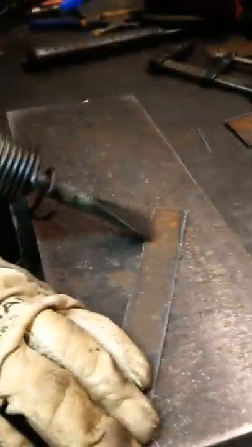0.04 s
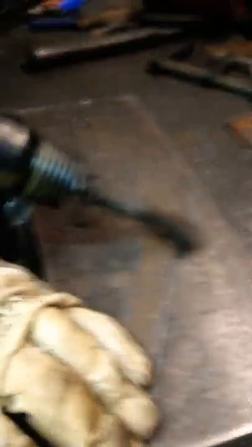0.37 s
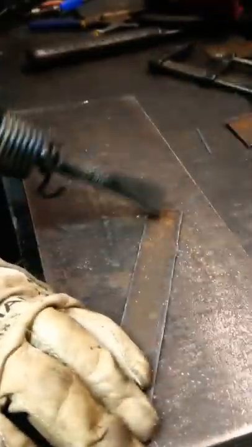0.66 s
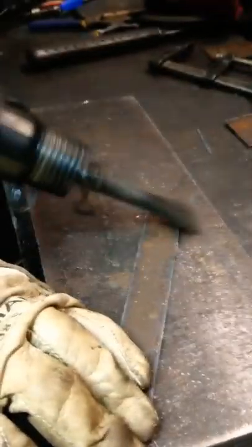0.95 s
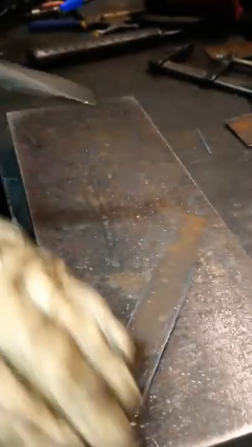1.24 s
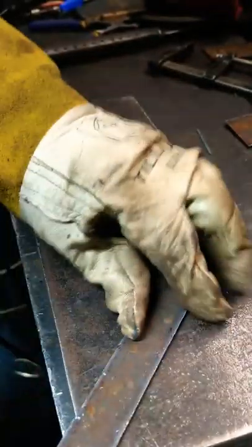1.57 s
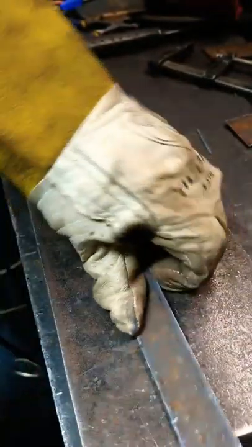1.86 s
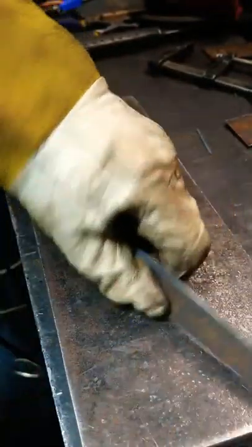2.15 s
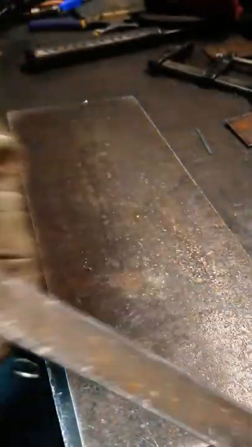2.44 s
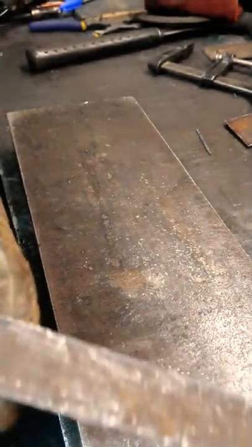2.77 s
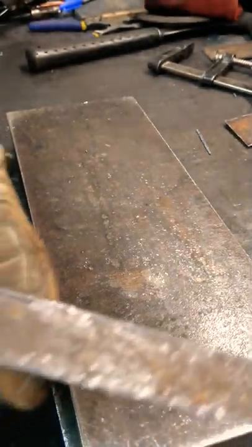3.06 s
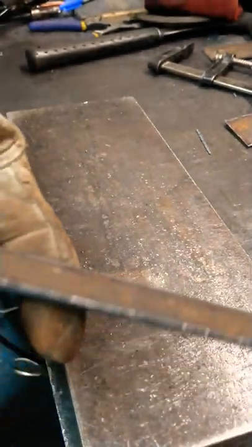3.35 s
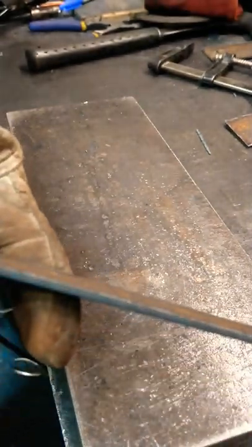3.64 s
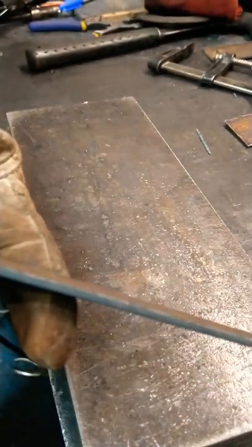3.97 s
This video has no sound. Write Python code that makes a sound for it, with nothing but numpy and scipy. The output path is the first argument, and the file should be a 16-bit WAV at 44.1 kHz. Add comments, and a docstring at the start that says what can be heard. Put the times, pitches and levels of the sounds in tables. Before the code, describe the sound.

In a small workshop, an air hammer clatters on steel three times under blasts of exhaust, with ringing clinks and stray puffs between. It then settles into rapid, even puffing and light knocking, close by on the right.

```python
"""An air hammer drives its chisel against a steel bar on a metal bench in three short bursts:
piston blows clatter under a blast of exhaust, and after each burst the loose chisel clinks and rings.
With the trigger eased the piston keeps cycling on a trickle of air: single sluggish strokes at first,
then a steady chuffing close by on the right. A small workshop echoes it, and a limiter holds each
channel down."""
import sys
import numpy as np
from scipy import signal
from scipy.fft import rfft, irfft
from scipy.io import wavfile
from scipy.ndimage import uniform_filter1d

SR = 44100
rng = np.random.default_rng(int(sys.argv[2]) if len(sys.argv) > 2 else 0)


def materialize(psi):
    """Save the field psi as 16-bit PCM at rate SR to the path in sys.argv[1].

    A 1-D psi becomes a single channel; in a 2-D psi each row is a channel.
    """
    bounded = np.clip(np.atleast_2d(psi).T, -1, 1)
    quanta = np.round(bounded * 32767).astype(np.int16)
    wavfile.write(sys.argv[1], SR, quanta)


N = 176400
TIME = np.arange(N) / SR
PUFF_RISE_S, CHISEL_LEFT_DB = 0.00035, -10.5

# Spectrum of the exhaust blast and of the bar clattering on the bench: freq_hz, density_db
BLAST_SPECTRUM = [(40, -16), (90, 2.5), (170, -1.5), (350, -0.5), (1000, -0.5), (2500, -2), (4500, -0.5),
                  (6200, -2), (9500, 5), (12500, 1), (16000, -2.5)]
# Chisel modes in three close pairs: pitch_hz, t60_s, level_db (while hammered)
CHISEL_MODES = [(8073, 0.18, -26.5), (8030, 0.055, -32), (9300, 0.09, -19.5), (9420, 0.07, -19),
                (14460, 0.12, -36), (14470, 0.063, -21.5)]


def from_db(db):
    """Decibels to gain."""
    return 10 ** (np.asarray(db) / 20)


def pan_right(left_db):
    """Stereo gains that turn down the left side only."""
    return np.array([[from_db(left_db)], [1]])


def colour(x, points):
    """Equalise along a curve of (freq_hz, gain_db) points."""
    hz, db = np.transpose(points)
    freqs = np.maximum(np.fft.rfftfreq(x.shape[-1], 1 / SR), 1)
    gain = from_db(np.interp(np.log(freqs), np.log(hz), db))
    return irfft(rfft(x) * gain, x.shape[-1])


def noise(points, channels=2):
    """Coloured noise of rms 1."""
    x = colour(rng.standard_normal((channels, N)), points)
    return x / x.std()


def clicks(start_s, level_db):
    """Impulses at the given times and levels."""
    out = np.zeros(N)
    inside = (start_s >= 0) & (start_s < TIME[-1])
    np.add.at(out, (start_s[inside] * SR).astype(int), from_db(level_db)[inside])
    return out


def fade(x, decay_s):
    """Each click becomes a dying envelope of its own height."""
    return signal.lfilter([1], [1, -np.exp(-1 / (decay_s * SR))], x + 1e-18)


def ring(x, hz, t60_s):
    """One mode: a unit click starts a dying sine of height 1."""
    radius, angle = from_db(-60 / (t60_s * SR)), 2 * np.pi * hz / SR
    return signal.lfilter([0, np.sin(angle)], [1, -2 * radius * np.cos(angle), radius ** 2], x + 1e-18)


def body(x, modes):
    """Modes struck together, alternating in polarity."""
    return sum((-1) ** k * from_db(db) * ring(x, hz, t60) for k, (hz, t60, db) in enumerate(modes))


def room_tone():
    """The shop's faint, steady bed of low noise."""
    # Background spectrum: freq_hz, density_db
    spectrum = [(25, -20), (50, -13), (90, 3), (200, -8), (800, -7), (2000, -12), (6000, -16), (10000, -25),
                (16000, -26)]
    return from_db(-39) * noise(spectrum) * pan_right(-4)


def workshop_reverb(send, t60_s=0.35, predelay_s=0.0031):
    """Dense reflections of the send's right channel, different for each ear."""
    # Tone of the reflections: freq_hz, gain_db
    room_eq = [(60, -3), (250, -3.5), (800, 2.5), (2000, -6.5), (5000, 0.5), (10000, -1), (16000, -2)]
    t = TIME[:SR]
    tail = rng.standard_normal((2, SR)) * from_db(-60 * t / t60_s) * (t > predelay_s)
    tail /= np.sqrt(np.sum(tail ** 2, axis=1, keepdims=True))
    tail = colour(tail, room_eq)[:, :SR // 2]
    return from_db([[-11.5], [-1]]) * signal.fftconvolve(send[1:], tail, axes=1)[:, :N]


def air_thump(puffs, start_hz=352, end_hz=61, fall_s=0.0038, decay_s=0.0096):
    """The low pressure wave of escaping air falls in pitch as it dies."""
    t = TIME[:SR // 10]
    pitch_hz = end_hz + (start_hz - end_hz) * np.exp(-t / fall_s)
    envelope = np.exp(-t / decay_s) - np.exp(-t / PUFF_RISE_S)
    wave = np.cos(2 * np.pi * np.cumsum(pitch_hz) / SR) * envelope
    return pan_right(-27) * from_db(-16.5) * signal.fftconvolve(puffs, wave)[:N]


def port_whistle(puffs, wander=0.025, wander_s=0.012, spread_db=5):
    """The exhaust ports whistle briefly with each puff, their pitches wandering."""
    # Port tones: pitch_hz, t60_s, level_db
    tones = [(7760, 0.0077, -17), (8770, 0.041, -20.5), (10130, 0.031, -16.5), (13500, 0.022, -21),
             (14900, 0.052, -19.5)]
    knots_s = np.arange(0, TIME[-1] + wander_s, wander_s)
    whistle = 0
    for hz, t60, db in tones:
        drift = np.interp(TIME, knots_s, rng.standard_normal(N)[:len(knots_s)])
        pitch_hz = hz * (1 + wander * drift)
        accents = from_db(db + spread_db * rng.standard_normal(N))
        envelope = fade(puffs * accents, t60 / np.log(1000))
        whistle += envelope * np.sin(2 * np.pi * np.cumsum(pitch_hz) / SR)
    return from_db(-3) * pan_right(-7.5) * whistle


def puff_hiss(left, right, decay_s=0.0014):
    """Sharp spits of air from the steady idle, with a different tone in each ear."""
    # Hiss at the left ear: freq_hz, density_db
    left_spectrum = [(100, -4), (600, -15), (1700, -9), (3600, -5), (5100, -17), (5900, -1), (8000, -2),
                     (10200, -5.5), (12500, 4.5), (14500, -0.5), (16000, -10)]
    # Hiss at the right ear: freq_hz, density_db
    right_spectrum = [(100, -14), (600, -7.5), (1500, -11), (3000, -12.5), (4200, -11.5), (5500, -13),
                      (7000, -5.5), (8500, 1.5), (10200, 3), (12500, -1), (14500, -0.5), (16000, -26.5)]
    air = np.vstack([noise(left_spectrum, channels=1), noise(right_spectrum, channels=1)])
    puffs = np.vstack([left, right])
    return from_db(1.5) * air * (fade(puffs, decay_s) - fade(puffs, PUFF_RISE_S))


def weak_hiss(puffs, decay_s=0.0025):
    """A sluggish stroke lets out a softer-edged breath of air."""
    # Hiss of a weak puff: freq_hz, density_db
    spectrum = [(200, -4), (1500, -20), (3000, -22), (6200, -23.5), (7400, -1.5), (8800, -1), (10000, 6),
                (11500, -4.5), (13300, -1.5), (16000, -19)]
    envelope = fade(puffs, decay_s) - fade(puffs, decay_s / 3)
    return from_db(0.5) * pan_right(-7.5) * noise(spectrum) * envelope


def piston_knock(knocks):
    """The piston knocks hollowly in the tool and plucks the barrel's air column as it slides."""
    # Modes of the knock: pitch_hz, t60_s, level_db
    tool_modes = [(284.4, 0.055, -28.5), (506, 0.061, -29.5), (682, 0.11, -27.5), (896, 0.046, -24.5),
                  (1330, 0.0072, -28.5), (2385, 0.047, -39)]
    # Odd modes of the air column: pitch_hz, t60_s, level_db
    barrel_modes = [(837, 0.047, -23.5), (2476, .05, -33)]
    # Plucks of the air column: start_s, level_db
    plucks = [(.286, -1), (.328, -7), (.351, 1), (.388, 0.5), (.409, 2.5), (.797, -6.5), (.821, 0.5),
              (.904, -2), (.944, -8), (.964, 4.5), (.982, -10), (1.009, -4), (1.028, 9)]
    barrel = body(clicks(*np.transpose(plucks)), barrel_modes)
    return from_db([[2.5], [0]]) * (body(knocks, tool_modes) + barrel)


def idle_strokes(start_s=1.7295):
    """The piston settles into a steady cycle; gives each stroke's time and air pressure."""
    # Piston speed: time_s, rate_hz
    speed = [(1.73, 21.47), (1.85, 22.57), (2.15, 22.53), (2.45, 23.35), (2.85, 23.53), (3.2, 23.01),
             (3.45, 23.55), (4.0, 22.88)]
    # Air pressure: time_s, level_db
    pressure = [(1.73, -0.5), (2.25, 1.4), (2.7, 1), (3.0, -1.84), (3.5, -1.5), (4.0, -3)]
    rate_hz = np.interp(TIME, *np.transpose(speed)) * (TIME >= start_s)
    cycles = np.cumsum(rate_hz) / SR
    stroke_s = np.searchsorted(cycles, np.arange(int(cycles[-1]) + 1), side="right") / SR
    return stroke_s, np.interp(stroke_s, *np.transpose(pressure))


def idling_piston(jitter_s=0.00022, puff_spread_db=1.53, thump_spread_db=3):
    """On a trickle of air each stroke knocks and puffs, singly at first; gives (sound, thumps)."""
    # Sluggish single strokes: start_s, puff_db, knock_db
    lone_strokes = [(0.28, -1, -15), (0.344, -0.5, -26), (0.359, -13, -29), (0.404, -0.5, -20),
                    (.418, 2, -25), (0.816, 1, -15), (0.897, -9, -31), (0.961, -1.5, -37), (1.024, 2.5, -7),
                    (1.356, 7, -5.5), (1.416, 3, -7), (1.454, -4, -11), (1.496, 3.5, -19), (1.554, 3, -4),
                    (1.613, 3.5, -1), (1.672, 3, -0.5)]
    # The four puffs of each steady stroke: delay_s, right_db, left_db, thump_db, knock_db
    puff_pattern = [(0, 1.5, -12.5, -4.5, -13.5), (.0036, -8, -34, -5.5, 0.5), (.0102, 2, -8, 0.5, -9.5),
                    (0.0144, -8.5, -37, -37, -10)]
    lone_s, lone_puff_db, lone_knock_db = np.transpose(lone_strokes)
    weak_puffs = clicks(lone_s, lone_puff_db)
    thumps = clicks(lone_s, lone_knock_db)
    knocks = clicks(lone_s + 0.00505, lone_knock_db)  # the knock trails its puff
    stroke_s, pressure_db = idle_strokes()
    push_db = 1.64 * pressure_db  # the thump swings further with pressure than the hiss
    left, right = np.zeros((2, N))
    for delay_s, right_db, left_db, thump_db, knock_db in puff_pattern:
        jitter, strength, gust = rng.standard_normal((3, len(stroke_s)))
        puff_s = stroke_s + delay_s + jitter_s * jitter
        puff_db = pressure_db + puff_spread_db * strength
        left += clicks(puff_s, puff_db + left_db)
        right += clicks(puff_s, puff_db + right_db)
        thumps += clicks(puff_s, push_db + thump_db + thump_spread_db * gust)
        knocks += clicks(stroke_s + delay_s, puff_db + knock_db)
    air = puff_hiss(left, right) + weak_hiss(weak_puffs) + port_whistle(right + weak_puffs / 2)
    return air + piston_knock(knocks), air_thump(thumps)


def bench_thud():
    """The tool bumps the bench, which answers with one short, low mode."""
    # Bumps: start_s, level_db
    bumps = [(0.139, -12), (0.184, -5), (1.25, -23), (1.48, -15.5), (1.521, -19)]
    return ring(clicks(*np.transpose(bumps)), hz=142, t60_s=0.024)


def loose_chisel(chatter_s=0.006, twin_mode_db=-9):
    """The chisel chatters in its retainer and rings in three pairs of modes; the bar clanks."""
    # Clinks: start_s, low_ring_db, middle_ring_db, top_ring_db, clank_db
    clinks = [(.186, -7, 3.5, -12, 3), (.239, -11, 6, -18, -6), (.722, -16, 2.5, -15, -6),
              (.764, -18, -5, -15, -36), (.776, -25, -9, -17, -40), (.853, -15, -16, -22, -15.5),
              (.889, -16, -30, -24, -13), (0.912, -36, -34, -30, -20.5), (1.322, -5, -0.5, -4, -12),
              (1.378, -5, -10, -10, -8), (1.392, -2, -20, -25, -7.5), (1.424, -28, -7, -24, -8),
              (1.437, -15, 2.5, -24, -29), (1.463, -25, -16, -11, -4.5), (1.474, -9, -6, -17, -9),
              (1.511, -23, -1.5, -14, -12), (1.578, -28, -8, -37, -39)]
    # Modes of the steel bar: pitch_hz, t60_s, level_db
    bar_modes = [(1256, 0.043, -13.5), (1810, 0.048, -19), (3755, 0.1, -15.5), (3960, .09, -16),
                 (4660, .07, -17.5), (5350, 0.11, -14.5)]
    start_s, *pair_db, clank_db = np.transpose(clinks)
    chatter_gain = from_db(0.5) * np.sqrt(2 / (chatter_s * SR))
    rings = 0
    for k, (hz, t60, _) in enumerate(CHISEL_MODES):
        contact = clicks(start_s, pair_db[k // 2] + twin_mode_db * (k % 2))
        chatter = chatter_gain * fade(contact, chatter_s) * rng.standard_normal((2, N))
        rings += ring(contact + chatter, hz, t60)
    bar_hits = clicks(start_s, clank_db)
    clank = from_db(0.5) * noise(BLAST_SPECTRUM) * fade(bar_hits, decay_s=0.012)
    return pan_right(CHISEL_LEFT_DB) * (rings + clank + body(bar_hits, bar_modes))


def piston_blows(blow_hz=70, blow_spread_db=5.5, bounces_per_s=350, bounce_spread_db=3.2):
    """A nearly even train of blows, with random bounces scattered among them."""
    jitter, strength = rng.standard_normal((120, 2)).T
    blow_s = (np.arange(len(jitter)) + 0.07 * jitter) / blow_hz
    bounces = rng.random(N) < bounces_per_s / SR
    bounce_db = -1.5 + bounce_spread_db * rng.standard_normal(N)
    return clicks(blow_s, blow_spread_db * strength) + bounces * from_db(bounce_db)


def air_hammer(attack_s=0.007, release_s=0.012, lift_s=0.07, pressed_db=-2, free_db=9.5):
    """Blows clatter on the steel and ring the chisel under a blast of exhaust; gives (sound, thumps)."""
    # Bursts at full trigger: start_s, end_s, level_db
    bursts = [(-.03, 0.162, -1.5), (0.441, 0.731, -0.5), (1.038, 1.295, -1)]
    throttle, lift = np.zeros((2, N))
    for start_s, end_s, level_db in bursts:
        opening = np.clip((TIME - start_s) / attack_s, 0, 1)
        closing = np.exp(-np.maximum(TIME - end_s, 0) / release_s)
        throttle += from_db(level_db) * opening * closing
        lift += np.exp(-np.abs(TIME - end_s) / lift_s)
    hits = throttle * piston_blows()
    exhaust = noise(BLAST_SPECTRUM) * throttle
    clatter = noise(BLAST_SPECTRUM) * np.sqrt(fade(hits ** 2, decay_s=0.0018))
    roar = from_db(-6.5) * pan_right(-4) * (exhaust + clatter)
    # the chisel rings more freely as it lifts off towards the end of a burst
    drive = hits * (from_db(pressed_db) + from_db(free_db) * lift)
    rings = sum(from_db(db) * ring(drive * rng.standard_normal((2, N)), hz, t60)
                for hz, t60, db in CHISEL_MODES)
    return roar + pan_right(CHISEL_LEFT_DB) * rings, from_db(-9.5) * air_thump(hits)


def scene():
    """The tool at work and at idle in the shop; the air thumps stay out of the reverb."""
    hammer, hammer_thumps = air_hammer()
    idle, idle_thumps = idling_piston()
    rattle = loose_chisel() + bench_thud()
    reverb = workshop_reverb(idle + from_db(-10) * hammer + from_db(-12.5) * rattle)
    return room_tone() + reverb + idle + idle_thumps + rattle + hammer + hammer_thumps


def record(dry, threshold_db=-3, release_db_per_s=241, window_s=0.0066, ceiling=1.13):
    """A fast limiter on each channel, soft-clipped peaks, then a low cut and a steep high cut."""
    power = uniform_filter1d(dry ** 2, int(window_s * SR), axis=1)
    over_db = np.maximum(10 * np.log10(np.maximum(power, 1e-12)) - threshold_db, 0)
    recovery_db = release_db_per_s * TIME
    reduction_db = np.maximum.accumulate(over_db + recovery_db, axis=1) - recovery_db
    limited = ceiling * np.tanh(dry * from_db(-reduction_db) / ceiling)
    low_cut = signal.butter(2, 65, "high", fs=SR, output="sos")
    high_cut = signal.ellip(10, 0.2, 70, 15850, fs=SR, output="sos")
    return signal.sosfilt(high_cut, signal.sosfilt(low_cut, limited))


dry = scene()
out = record(dry)
materialize(out)
```